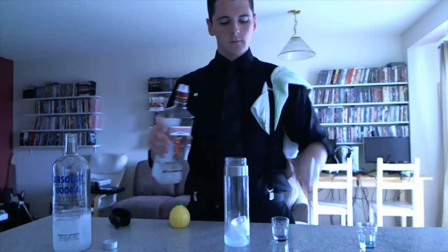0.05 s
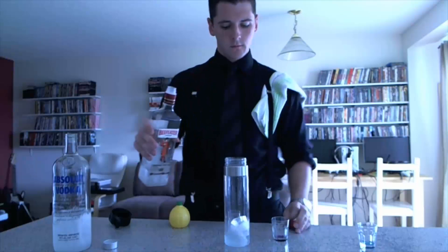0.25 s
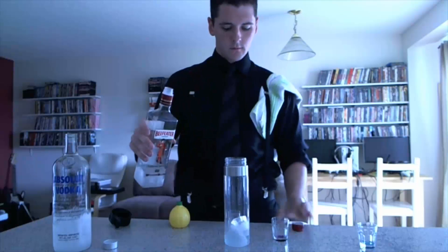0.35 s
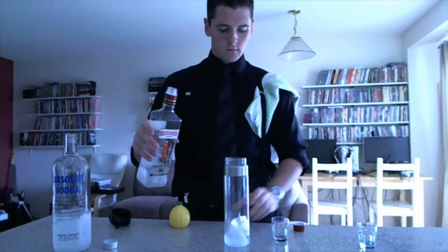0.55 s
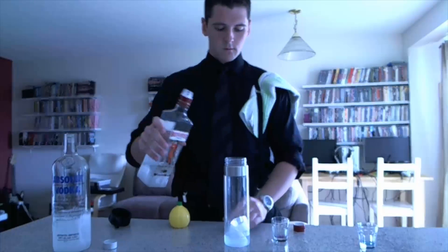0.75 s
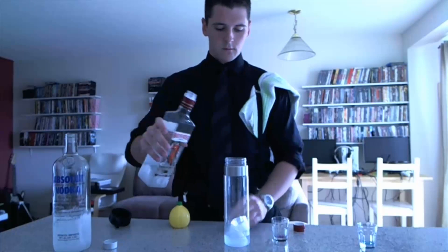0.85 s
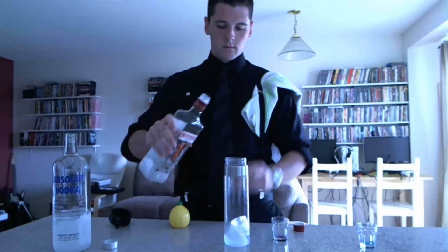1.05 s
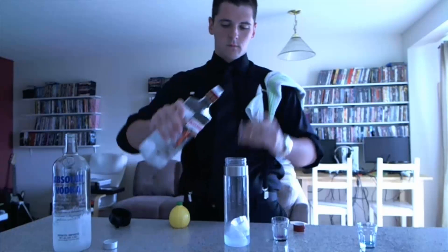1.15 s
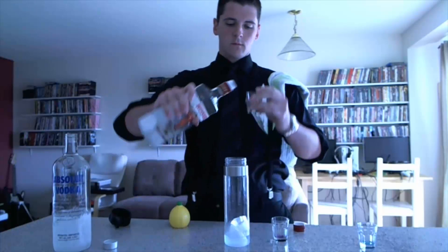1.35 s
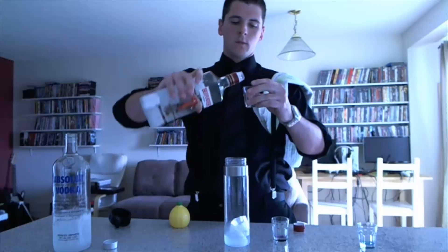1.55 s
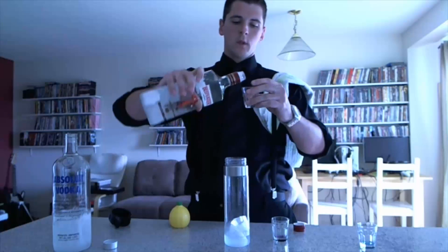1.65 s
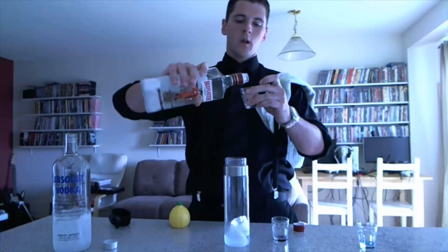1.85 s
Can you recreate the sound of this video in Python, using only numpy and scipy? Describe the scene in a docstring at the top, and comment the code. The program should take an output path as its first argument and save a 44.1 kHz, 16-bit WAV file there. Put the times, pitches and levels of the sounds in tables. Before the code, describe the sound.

A plastic cap drops on a stone counter, rattling in loud, dry, irregular clicks from 0.2 to 0.35 s, one overloading with a snap near 0.31, with short room reverberation. Barely audible dull thuds precede it. A small glass drags briefly at 0.66-0.75 s. After near quiet, faint high glass ticks come at 1.45 and soft thuds at 1.58-1.68. Low hiss, hum and thin electronic whine continue throughout.

```python
"""Faint dull thuds come first. A plastic screw cap then drops on a stone counter in a living room and rattles
to rest: each bounce excites its damped modes. Next a small glass is dragged, its uneven slips ringing glass
and counter; later the glass ticks in a few high modes, and more dull thuds of two low modes follow.
Wall echoes and a noise tail reverberate all but the thuds. Room hiss with narrow wavering bands, mains hum
and a thin electronic whine, both sums of sines, last throughout."""
import sys
import numpy as np
from scipy import signal
from scipy.io import wavfile

SR = 44100
rng = np.random.default_rng(int(sys.argv[2]) if len(sys.argv) > 2 else 0)


def bounce(signal):
    """Save signal as a 16-bit WAV file at the path given by the first command-line argument."""
    frames = np.transpose(np.atleast_2d(signal))
    limited = np.clip(frames, -1, 1)
    pcm = np.round(limited * 32767).astype(np.int16)
    wavfile.write(sys.argv[1], SR, pcm)


N = 83790

# Every decay time T60 of a struck body is that of one pass of its resonator, which is passed twice.
# Bounces of the cap: t/s, level/dB, then six relative ring levels/dB, one at each BOUNCE_RING_HZ
CAP_BOUNCES = [(0.2022, -7, -22, 0, 5.5, -3, -40.5, -8.5), (0.2131, -13, -11.5, 1.5, -3.5, -3, -18, -11),
               (0.2254, -27, 0.5, 3, -2.5, 6.5, -21.5, -17.5), (0.2369, -24, -14, -2, -7.5, -9.5, 2, -8.5),
               (.2485, -18, -5, -2, -10, -6, -4, -4), (0.2511, -4, -3, 2, -43, -5.5, 0, -4.5),
               (.2930, -11, -7, -4, -3, -1, -10, -12), (.3108, -3.5, -15.5, -5.5, 4, -1, 8.5, -7.5),
               (0.3219, -11.5, -1.5, 3, -1.5, -10.5, -8.5, -7),
               (0.3419, -3, -12, -8, -8.5, -14, -0.5, -15.5)]
# Frequencies at which the ring of a bounce is given: f/Hz
BOUNCE_RING_HZ = [900, 1800, 3300, 5100, 7500, 11000]
# Modes of the cap: f/Hz, relative level/dB
CAP_MODES = [(450, -27), (780, -12.5), (1050, -8.5), (1420, -7.5), (1800, -6), (2180, -5), (2620, -6),
             (3270, -7), (3900, -5.5), (4500, -6), (5150, -5.5), (7000, -21), (7700, -19), (9000, -29.5),
             (10500, -36.5), (12200, -36)]
# Decay of the cap modes: f/Hz, T60/s
CAP_DECAY = [(450, .01), (1000, .006), (2000, .0036), (4500, .003), (5150, .004), (12000, .003)]
CAP_BODY_TOP_HZ = 6000  # divides body modes from rim modes, and low-passes the body

# Course of the drag: t/s, relative level of low modes/dB, relative level of high modes/dB
DRAG_COURSE = [(0.655, -53, -82), (0.661, -42, -47), (0.677, -29, -28.5), (0.689, -29, -29.5),
               (0.695, -52, -45.5), (0.725, -41.5, -66), (0.745, -79, -80), (0.75, -59, -77)]
# Modes of dragged glass and counter: f/Hz, relative level/dB
DRAG_MODES = [(225, -14.5), (500, 0), (550, 5.5), (655, -2), (860, 0), (1050, -0.5), (1250, -6.5),
              (1500, -6), (2000, -47), (2500, -17.5)]
# Decay of those modes: f/Hz, T60/s
DRAG_DECAY = [(225, .04), (500, .03), (2500, .01)]
DRAG_SLIPS_PER_S, DRAG_SPLIT_HZ = 1000, 750  # mean slip rate; border of low and high modes

# Ticks of the glass: t/s, level/dB
GLASS_TICKS = [(1.4438, -31), (1.4478, -42), (1.4512, -34), (1.4531, -32), (1.4600, -56)]
# Main modes of the glass: f/Hz, relative level/dB
GLASS_MODES = [(5600, -17), (6200, -7.5), (6800, -3), (7400, -7.5), (8000, -46)]
# A faint high mode of the glass: f/Hz, relative level/dB
GLASS_TOP_MODE = [(12500, -38)]
# Band that passes the main modes of the glass: lower f/Hz, upper f/Hz
GLASS_PASS_HZ = [5300, 8500]
# Dull thuds: t/s, level/dB
DULL_THUDS = [(.015, -52), (.073, -48), (.160, -54), (1.582, -43), (1.627, -48), (1.664, -46), (1.679, -47)]
# Modes of a thud: f/Hz, relative level/dB
THUD_MODES = [(218, -9.5), (295, -11)]
GLASS_T60_S, THUD_T60_S = .0025, .05

# Echoes of the near walls: delay/s, level/dB
WALL_ECHOES = [(.0075, -9.5), (.0090, -12), (.018, -18), (.024, -18), (0.029, -18)]
# Decay of the reverberation before its extra bend: f/Hz, T60/s
ROOM_DECAY = [(250, 0.27), (600, 0.23), (1200, 0.38), (2500, .33), (3500, 0.32), (5000, 0.73), (7500, 0.24),
              (12000, 0.83)]
# Initial spectrum of the reverberation: f/Hz, relative level/dB
ROOM_SPECTRUM = [(250, 4.5), (600, 1.5), (1200, -3.5), (2500, 6.34), (3500, 0.5), (5000, 3.7), (7500, 8.5),
                 (12000, -9)]
# Side against mid in the reverberation: f/Hz, level/dB
ROOM_SIDE_LEVEL = [(60, -12.5), (110, -4.5), (200, -25), (380, -6.5), (700, -16.5), (1290, -22.5),
                   (2380, -29.5), (4400, -20.5), (8120, -22.5), (15000, -5)]
ROOM_DB, ROOM_RISE_S, ECHO_SMEAR_S = -34.5, .004, .0005
ROOM_BEND_DB_PER_S2 = 348.5  # the tail falls ever faster
DRAG_ROOM_DB, TICK_ROOM_DB = -3.5, -6.5  # sends to the room, against that of the cap

# Spectral density of the room hiss: f/Hz, relative level per Hz/dB
HISS_SPECTRUM = [(45, -38.5), (70, -23), (100, -23.5), (140, -9), (220, -3.5), (300, -16.5), (500, -14),
                 (700, -10), (1000, -12.5), (1500, -17.5), (2100, -14.5), (2600, -21), (3200, -25.5),
                 (4500, -21.5), (6000, -33), (8000, -37), (12500, -46.5)]
# Side against mid in the hiss: f/Hz, level/dB
HISS_SIDE_LEVEL = [(60, -6.5), (110, -12), (200, -10.5), (380, -12), (700, -25), (1290, -24), (2380, -29),
                   (4400, -22), (8120, -20), (15000, -18)]
# Balance of the hiss: f/Hz, left minus right/dB
HISS_LEFT_RIGHT = [(60, 3.0), (110, 22), (200, 0.5), (380, 10.5), (700, 4.0), (1290, 2.5), (2380, -5),
                   (4400, 1), (8120, 0.5), (15000, -5)]
# Wavering narrow bands in the hiss: f/Hz, width/Hz, rms level/dB
NARROW_BANDS = [(235, 14, -69.5), (313.6, 14, -72), (410, 14, -78.5), (594, 9.6, -73.5), (1180, 6.9, -75.5)]
# Lines of the mains hum: f/Hz, rms level/dB
HUM_LINES = [(56, -95), (64, -83.5), (120, -65.5)]
# Harmonics of the electronic whine: multiple of WHINE_HZ, rms level/dB
WHINE_HARMONICS = [(2, -81.5), (3, -87.5), (5, -86.5), (7, -96.5), (9, -97.5), (10, -106), (11, -100.5),
                   (12, -94)]
HISS_DB, WHINE_HZ = -61, 1000  # hiss rms level; whine fundamental
EDGES_HZ = 45 * 2 ** np.arange(0, 8.6, 1 / 3)  # third-octave band edges

# Span searched for the converter overflow: start t/s, stop t/s
OVERFLOW_SPAN_S = (.3110, .3120)
OVERFLOW_LEVEL = .9  # sample value before the last filter
SOUND_STOP_HZ, FINAL_STOP_HZ = 12900, 17300  # stopband edges, before and after the overflow


def amp(db):
    """Decibels express an amplitude ratio on a logarithmic scale, 20 dB a decade."""
    return 10 ** (np.asarray(db) / 20)


def at_hz(points, hz):
    """A spectrum given at points is interpolated linearly over log frequency."""
    points = np.array(points)
    return np.interp(np.log(hz), np.log(points[:, 0]), points[:, 1])


def clicks_at(s, gains):
    """An ideal blow is an impulse: one sample carries its whole strength."""
    out = np.zeros(N)
    np.add.at(out, (np.asarray(s) * SR).astype(int), gains)
    return out


def ring(clicks, hz, t60):
    """Damped resonance: passed twice, a unit click swells to a sine of height about 1 and dies."""
    radius = amp(-60 / (t60 * SR))
    angle = 2 * np.pi * hz / SR
    resonator = [.5, 0.031, -.5, 1, -2 * radius * np.cos(angle), radius * radius]
    height = 2 * np.e * (1 - radius)
    return height * signal.sosfilt([resonator, resonator], clicks + 1e-18)  # offset avoids denormals


def strike(s, db, modes, t60, scatter_db):
    """Modal superposition: every blow rings every mode, at levels scattered by chance."""
    db = db + scatter_db * rng.standard_normal((len(s), len(modes)))
    t60 = t60 + np.zeros(len(modes))
    out = 0
    for k, (hz, level_db) in enumerate(modes):
        clicks = clicks_at(s, amp(db[:, k] + level_db))
        out = out + ring(clicks, hz, t60[k])
    return out


def blows(rows, modes, t60):
    """Impulsive excitation of a single body: each blow has one level for all its modes."""
    s, db = np.transpose(rows)
    return strike(s, db[:, None], modes, t60, scatter_db=2)


def cap():
    """Position-dependent excitation: landing on another edge, each bounce favours other modes."""
    rows, modes = np.array(CAP_BOUNCES), np.array(CAP_MODES)
    mode_hz = modes[:, 0]
    db = np.array([row[1] + at_hz(list(zip(BOUNCE_RING_HZ, row[2:])), mode_hz) for row in rows])
    low = mode_hz < CAP_BODY_TOP_HZ

    def part(chosen):
        """Modes superpose linearly, so a subset may be sounded alone."""
        t60 = at_hz(CAP_DECAY, mode_hz[chosen])
        return strike(rows[:, 0], db[:, chosen], modes[chosen], t60, scatter_db=6)

    body, rim = part(low), part(~low)
    # the body radiates little above its modes
    body_filter = signal.butter(4, CAP_BODY_TOP_HZ, fs=SR, output="sos")
    return signal.sosfilt(body_filter, body) + rim


def drag():
    """Frictional excitation: dense, uneven random slips ring the modes of glass and counter."""
    s, low_db, high_db = np.transpose(DRAG_COURSE)
    slip_now = rng.random(N) < DRAG_SLIPS_PER_S / SR
    slips = slip_now * rng.standard_normal(N) * np.sqrt(SR / DRAG_SLIPS_PER_S)  # unit mean power
    t = np.arange(N) / SR
    # silent (-150 dB) outside the course; -30.5 dB sets the overall level
    low = slips * amp(np.interp(t, s, low_db, -150, -150) - 30.5)
    high = slips * amp(np.interp(t, s, high_db, -150, -150) - 30.5)
    out = 0
    for hz, level_db in DRAG_MODES:
        force = low if hz < DRAG_SPLIT_HZ else high
        out = out + amp(level_db) * ring(force, hz, at_hz(DRAG_DECAY, hz))
    return out


def glass_ticks():
    """Modal ringing of a small stiff body: short high modes, the main group band-limited."""
    band_filter = signal.butter(4, GLASS_PASS_HZ, "band", fs=SR, output="sos")
    main = signal.sosfilt(band_filter, blows(GLASS_TICKS, GLASS_MODES, GLASS_T60_S))
    return main + blows(GLASS_TICKS, GLASS_TOP_MODE, GLASS_T60_S)


def thuds():
    """Low modal ringing: each blow excites two low, damped modes."""
    return blows(DULL_THUDS, THUD_MODES, THUD_T60_S)


def bands(size, side_db):
    """Mid-side synthesis: yields centre and stereo noise of each third octave, equal mid power per Hz."""
    white = rng.standard_normal((2, 2, size))
    for k, (low, high) in enumerate(zip(EDGES_HZ, EDGES_HZ[1:])):
        band_filter = signal.butter(2, [low, high], "band", fs=SR, output="sos")
        mid, side = signal.sosfilt(band_filter, white[k % 2])  # neighbours use independent noise
        hz = np.sqrt(low * high)
        yield hz, mid + amp(at_hz(side_db, hz)) * side * [[1], [-1]]


def room(x):
    """Convolution with an impulse response: smeared wall echoes and a tail decaying band by band."""
    t = np.arange(SR // 2) / SR
    tail = 0
    for hz, band in bands(len(t), ROOM_SIDE_LEVEL):
        decay_db = at_hz(ROOM_SPECTRUM, hz) - 60 * t / at_hz(ROOM_DECAY, hz)
        tail = tail + amp(decay_db) * band
    rise = 1 - np.exp(-t / ROOM_RISE_S)
    response = amp(ROOM_DB) * tail * rise * amp(-ROOM_BEND_DB_PER_S2 * t ** 2)
    smear = sum(amp(db) * np.exp(-((t - delay_s) / ECHO_SMEAR_S) ** 2) for delay_s, db in WALL_ECHOES)
    response += smear * rng.standard_normal(len(t)) / np.sqrt(ECHO_SMEAR_S * SR)
    return signal.fftconvolve(x[None], response, axes=1)[:, :N]


def room_hiss():
    """Stationary noise: third-octave bands are weighted by a spectrum and a stereo balance."""
    hiss = 0
    for hz, band in bands(N, HISS_SIDE_LEVEL):
        balance_db = at_hz(HISS_LEFT_RIGHT, hz) * np.array([[.5], [-.5]])
        hiss = hiss + amp(at_hz(HISS_SPECTRUM, hz) + balance_db) * band
    return amp(HISS_DB) * hiss / hiss.std()


def narrow_bands():
    """Narrow-band noise: white noise through a sharp resonance wavers like an unsteady tone."""
    out = 0
    for hz, width_hz, db in NARROW_BANDS:
        radius = np.exp(-np.pi * width_hz / SR)
        poles = [1, -2 * radius * np.cos(2 * np.pi * hz / SR), radius * radius]
        band = signal.lfilter([1, 0, -1], poles, rng.standard_normal(2 * N))[N:]  # skip the build-up
        out = out + amp(db) * band / band.std()
    return out


def steady_tones(lines):
    """Fourier synthesis: steady sines of random phase, each with peak root two times its rms."""
    t = np.arange(N) / SR
    return sum(np.sqrt(2) * amp(db) * np.sin(2 * np.pi * (hz * t + rng.random())) for hz, db in lines)


def mains_hum():
    """Line spectrum of mains hum: a few steady low sines."""
    return steady_tones(HUM_LINES)


def electronic_whine():
    """Harmonic spectrum: steady sines at whole multiples of one fundamental."""
    return steady_tones([(WHINE_HZ * k, db) for k, db in WHINE_HARMONICS])


def scene():
    """Linear superposition of direct sound, reverberation and background."""
    bounces, dragged, ticks = cap(), drag(), glass_ticks()
    wet = room(bounces + amp(DRAG_ROOM_DB) * dragged + amp(TICK_ROOM_DB) * ticks)
    background = room_hiss() + narrow_bands() + mains_hum() + electronic_whine()
    return bounces + dragged + ticks + wet + thuds() + background


def record(dry):
    """Band limiting and overflow: all but the snap of a bounce's wrapped trough lacks top treble."""
    treble_filter = signal.cheby2(10, 40, SOUND_STOP_HZ, fs=SR, output="sos")  # a steep low-pass
    x = signal.sosfilt(treble_filter, dry)
    start, stop = (np.array(OVERFLOW_SPAN_S) * SR).astype(int)
    # lowest sum of two neighbouring samples on the left; both channels wrap high there
    trough = start + np.argmin(x[0, start:stop] + x[0, start + 1:stop + 1])
    x[:, trough:trough + 2] = OVERFLOW_LEVEL
    final_filter = signal.cheby2(12, 70, FINAL_STOP_HZ, fs=SR, output="sos")
    return signal.sosfilt(final_filter, x)


dry = scene()
out = record(dry)
bounce(out)
```